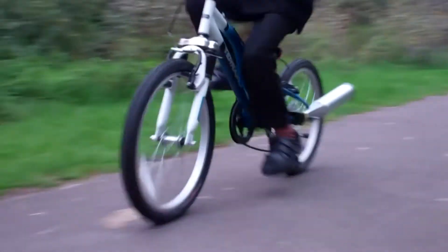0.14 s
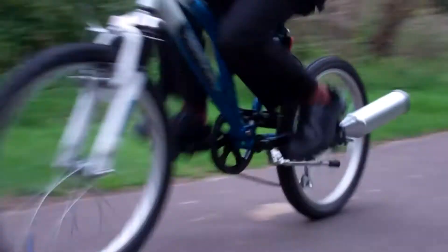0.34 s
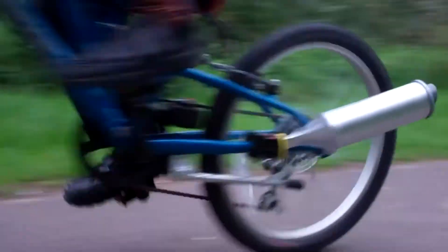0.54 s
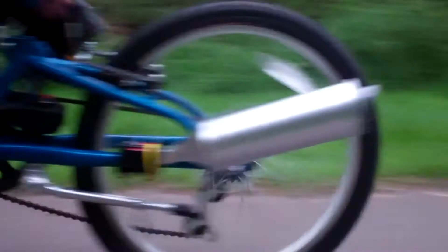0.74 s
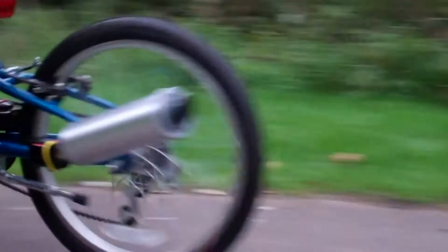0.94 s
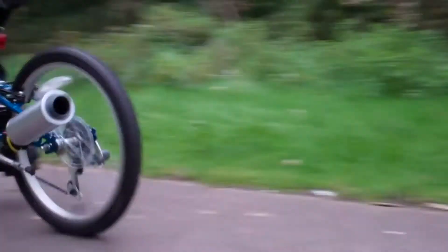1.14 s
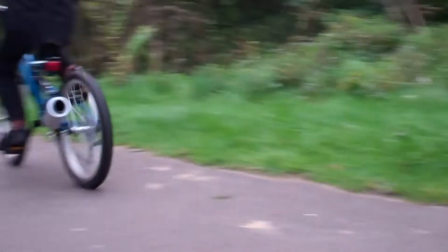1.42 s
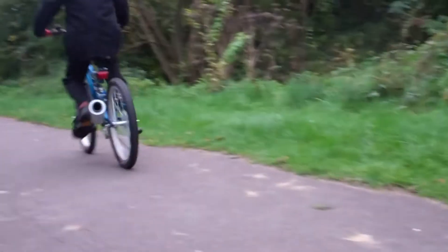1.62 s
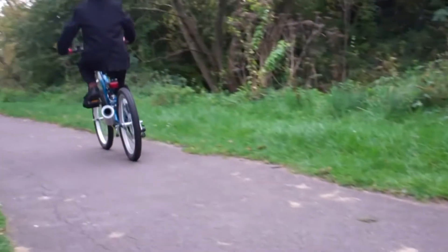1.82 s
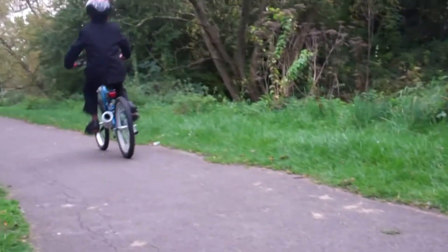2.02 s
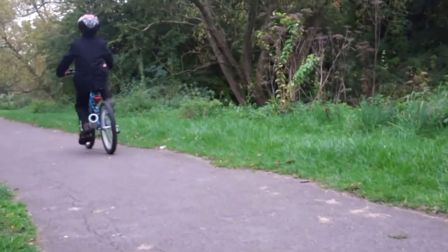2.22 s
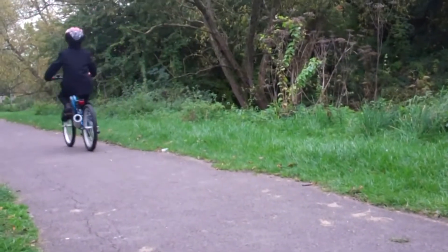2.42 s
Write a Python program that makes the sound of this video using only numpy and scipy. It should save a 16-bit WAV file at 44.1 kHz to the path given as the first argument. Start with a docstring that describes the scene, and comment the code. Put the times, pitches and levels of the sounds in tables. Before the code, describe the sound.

Rapid uneven snapping of card against turning bicycle spokes, swelling past and easing away on a path

```python
"""An uneven run of sharp snaps, much alike at every wheel turn: a bicycle rides past on a park path
with a stiff card flapping in its rear spokes, inside a toy exhaust pipe. Snaps and flaps are shaped noise
bursts, the card rings as decaying sines, and resonators driven by the flaps give the pipe's hollow notes.
A moving reflection off the path sweeps the colour and trees add a faint echo; there is one low thud.
A faint hum gives way to a low outdoor rumble of filtered noise."""
import sys
import numpy as np
from scipy import signal
from scipy.fft import rfft, irfft
from scipy.io import wavfile
from scipy.ndimage import uniform_filter1d, map_coordinates

SR = 44100
rng = np.random.default_rng(int(sys.argv[2]) if len(sys.argv) > 2 else 0)


def master_out(mix):
    """Clip the mix to full scale and print it as 16-bit PCM to the path in sys.argv[1]."""
    frames = np.transpose(np.atleast_2d(mix))
    ceiling = np.clip(frames, -1, 1)
    pcm = np.round(ceiling * 32767).astype(np.int16)
    wavfile.write(sys.argv[1], SR, pcm)


N = 112454   # samples

# completion of each half turn of the wheel: (time [s])
HALF_TURN_TIMES = [-.0374, .1356, .3042, .4737, .6468, .8178, .993, 1.1653, 1.3396, 1.5177, 1.6958, 1.8754,
                   2.0502, 2.2315, 2.4072, 2.5868, 2.756]
# lighter card-spoke contacts in one turn, relative levels:
# (wheel angle [deg], snap level [dB], flap level [dB], card ring level [dB])
LIGHT_CONTACTS = [(7.2, -7.0, -4.6, -5.6), (11.6, -19.7, -5.9, -7.0), (22.1, -2.8, 5.3, -2.0),
                  (28.6, 0.0, -4.8, -18.7), (31.8, -10.0, -6.5, -6.4), (39.3, -1.7, 2.3, 1.4),
                  (58.6, -2.9, -0.7, -5.0), (63.9, -15.3, -6.9, -6.5), (73.5, -5.2, 5.4, -2.4),
                  (80.4, -0.2, -4.8, -17.3), (90.8, -1.7, 2.6, 3.2), (109.5, -7.2, -4.4, -10.0),
                  (113.4, -5.3, -0.8, -5.9), (124.6, -4.8, 4.2, -4.1), (131.3, -2.3, -9.9, -17.9),
                  (134.2, -14.8, -16.4, -7.0), (141.6, -1.7, 1.5, 4.7), (160.4, -3.9, -4.5, -4.6),
                  (164.4, -8.0, -6.1, -2.7), (175.8, -6.0, 2.4, -1.6), (182.3, -3.6, -5.4, -15.1),
                  (185.3, -11.6, -15.9, -7.8), (192.9, -2.9, 1.5, 3.0), (212.0, -4.5, -0.0, -2.8),
                  (226.8, -7.2, 3.7, -2.0), (233.8, -2.5, -3.7, -15.0), (236.9, -10.0, -7.4, -4.8),
                  (244.6, -1.6, -0.4, 0.3), (264.3, -5.4, -2.3, -19.2), (267.9, -16.9, -16.6, -9.3),
                  (278.0, 0.2, 2.4, -15.9), (284.4, -3.6, -6.5, -3.8), (287.8, -7.6, -12.3, -13.4),
                  (292.4, -11.3, -14.9, -21.6), (294.1, -19.7, -10.8, -12.0), (305.7, -20.5, -19.8, -20.1),
                  (313.9, -16.3, -9.4, -8.6), (317.1, -6.2, -9.4, -3.3), (331.0, -3.7, 5.8, -0.0),
                  (338.0, -0.9, -3.6, -11.3), (341.4, -8.0, -2.3, -8.5), (348.5, -2.0, 2.6, 5.3)]
SCATTER_DB, SCATTER_S = .4, .00015   # standard deviation from one turn to the next
# hardest slap of each group of spokes; snap level relative, ring level absolute:
# (time [s], snap level [dB], ring peak level [dB], ring frequency [Hz], ring decay [s])
HARD_SLAPS = [(0.0121, 1, -12, 2620, 0.0018), (0.0611, 0, -14, 2800, 0.0018), (0.11, 0, -12, 2780, 0.0018),
              (0.1592, -0.2, -17.6, 3400.0, 0.0018), (0.2083, 2.2, -17.7, 3270.0, 0.0018),
              (0.3047, 1.9, -7.0, 3130.0, 0.0018), (0.3534, 1.0, -15.0, 3460.0, 0.0018),
              (0.4009, 0.6, -17.1, 2950.0, 0.0018), (0.4489, -0.2, -14.3, 3360.0, 0.0018),
              (0.498, 1.8, -9.0, 2810.0, 0.0018), (0.548, 1.0, -10.4, 3050.0, 0.0018),
              (0.6475, 1.1, -9.9, 3330.0, 0.0035), (0.6956, 3.6, -8.2, 3340.0, 0.0035),
              (0.7443, 0.8, -7.8, 3430.0, 0.0035), (0.7929, 1.5, -5.7, 3380.0, 0.0035),
              (0.8427, -0.5, -4.7, 3240.0, 0.0035), (0.8934, -0.9, -8.0, 3200.0, 0.0035),
              (0.9942, 0.6, -5.9, 2650.0, 0.0035), (1.0424, 1.3, -8.4, 2820.0, 0.0035),
              (1.0919, 1.3, -11.5, 2970.0, 0.0035), (1.1405, -1.0, -8.3, 3350.0, 0.0035),
              (1.1906, -1.0, -7.5, 2770.0, 0.0035), (1.24, 0.8, -8.4, 2960.0, 0.0035),
              (1.3406, 2.1, -9.8, 3290.0, 0.0018), (1.3912, -0.3, -13.1, 3310.0, 0.0018),
              (1.4423, 2.4, -15.1, 2510.0, 0.0018), (1.4925, 2.7, -19.0, 3480.0, 0.0018),
              (1.5427, 3.9, -16.3, 2510.0, 0.0018), (1.5938, -2.5, -16.9, 2870.0, 0.0018),
              (1.6965, 1.0, -11.6, 2810.0, 0.0018), (1.7482, 1.0, -13.3, 2750.0, 0.0018),
              (1.7994, 2.0, -10.6, 2870.0, 0.0018), (1.8497, 2.9, -10.6, 3250.0, 0.0018),
              (1.9001, -0.6, -14.9, 2920.0, 0.0018), (1.9502, 2.4, -12.7, 2970.0, 0.0018),
              (2.0517, 1.3, -13.4, 2910.0, 0.0018), (2.103, -2.4, -17.0, 3070.0, 0.0018),
              (2.1544, 2.8, -12.7, 2890.0, 0.0018), (2.2053, 2.5, -13.2, 2810.0, 0.0018),
              (2.2564, -0.0, -13.7, 2750.0, 0.0018), (2.3073, 0.2, -11.8, 2980.0, 0.0018),
              (2.4083, 4.0, -12.9, 2920.0, 0.0018), (2.4589, -0.0, -10.3, 2800.0, 0.0018),
              (2.5101, 2.0, -11.9, 2870.0, 0.0018)]
SLAP_FLAP_DB = 2.5
# levels along the ride: (time [s], snap level [dB], flap level [dB], pipe level [dB], light ring level [dB])
RIDE_LEVELS = [(0, -23, -25.5, -33, -51), (.22, -23, -26.5, -31, -29.5), (.3, -22, -28, -28, -33),
               (.42, -23, -49, -29.5, -39.5), (.57, -19.5, -38, -28.5, -22.5), (.7, -21, -31, -26.5, -36.5),
               (.88, -17.5, -27, -25.5, -28), (1.1, -21, -37, -27, -33.5), (1.3, -23, -41, -30, -33),
               (1.6, -24, -49, -32.5, -35.5), (1.9, -25, -35, -35.5, -44), (2.15, -24, -35.5, -35, -39),
               (2.33, -24, -39.5, -30.5, -36), (2.42, -22.5, -33.5, -33.5, -31), (2.55, -28, -42, -33, -37)]

# spectrum of the snap: (frequency [Hz], relative spectral level [dB])
SNAP_SPECTRUM = [(200, -15), (700, -28), (1400, -0.5), (2200, 0), (3000, -2.5), (3900, 1), (5000, 2.5),
                 (7500, 1), (10000, 0.5), (13500, 3.5), (16000, -11)]
# edges of the bands that each snap tints separately: (frequency [Hz])
SNAP_BAND_EDGES = [150, 1200, 1800, 2500, 3600, 4800, 6300, 8300, 11000, 16500]
SNAP_RISE_S, SNAP_DECAY_S = .0003, .0015
FLUTTER_DECAY_S, FLUTTER_DB = .007, -14.5   # weaker, longer tail, relative to the snap
COLOUR_SCATTER_DB, GRAIN_DB = 2.4, 3.0   # random band tint and fast level grain
# spectrum of the duller flap: (frequency [Hz], relative spectral level [dB])
FLAP_SPECTRUM = [(60, -25), (150, -9), (250, -4), (350, -10), (480, -7.5), (620, -7.5), (800, 2.5),
                 (1050, -6), (2000, -2), (3500, -2.5), (8000, -10.5)]
FLAP_RISE_S, FLAP_DECAY_S = .00036, .0055

# ringing pitch of the bent card, before the light contacts' factor: (time [s], frequency [Hz])
CARD_PITCH = [(0, 2800), (.3, 3200), (.65, 3350), (.75, 3430), (.85, 3300), (1.0, 2980), (1.2, 2980),
              (1.36, 3200), (1.55, 2550), (1.8, 2900), (2.55, 2850)]
# modes of the card: (ratio to its ringing pitch [1], level [dB])
CARD_MODE_TABLE = [(1, 0), (.8, -10)]
CARD_SPREAD, LIGHT_PITCH, LIGHT_DECAY_S = .06, .96, .0018   # pitch deviation and factor as ratios
# resonances of the pipe: (frequency [Hz], bandwidth [Hz],
# level with its mouth turned away [dB], sideways [dB], towards the listener [dB])
PIPE_RESONANCES = [(270, 57, -5, -19, -13), (484, 116, 0.5, -8, -29), (765, 110, 4.5, -4, -20),
                   (862, 48, -4, 2.5, 8), (1098, 160, -7, -2, -8), (1483, 52, -6, 1.5, -2),
                   (1995, 55, 7.5, 6, 5), (2410, 33, 9, 3.5, 15), (2937, 73, 6.5, 2.5, 5),
                   (3324, 74, -9, 3, -21)]
# aim of the pipe's mouth: (time [s], facing [-1 away, 0 sideways, 1 towards])
PIPE_FACING = [(.5, -0.64), (.75, 0.26), (1.05, 0), (1.45, 0.23)]
PIPE_DECAY_S, PIPE_SCATTER_DB = .0022, 2.2   # each flap strikes each note with its own strength

# colour of the reflection off the path: (frequency [Hz], level [dB])
GROUND_COLOUR = [(300, -24), (1000, 1.5), (2500, -12.5), (5000, -26), (10000, -25)]
# strength of that reflection along the ride: (time [s], level [dB])
GROUND_STRENGTH = [(0, -40), (.6, -18), (1.0, -3), (1.65, -3), (2.0, -19), (2.55, -43)]
PASS_S, SPEED_M_PER_S, SOUND_M_PER_S = .8, 5.6, 343
NEAREST_M, CARD_HEIGHT_M, LISTENER_HEIGHT_M = 1.65, .35, .97
TREES_T60_S, TREES_DB, TREES_CUT_HZ = .35, -12.5, 7000
# stereo image: (frequency [Hz], side-to-mid level [dB], left-right level [dB])
STEREO_WIDTH = [(100, -9.5, -0.5), (250, -10, 0.5), (616, -20, 1.5), (1500, -14, -1.5), (2720, -17, -0.5),
                (5100, -6, -.2), (9000, -6.5, -1), (13900, -5, -5)]
# lag of the right channel as the bicycle moves to the left: (time [s], lag [s])
RIGHT_CHANNEL_LAG = [(0, -.000008), (.65, .000006), (1.1, .000023), (2.55, .000023)]

THUD_S, THUD_HZ, THUD_DECAY_S = .7922, 276, .00081   # close to the nearest point
THUD_DB, THUD_LEFT_DB, THUD_LOW_CUT_HZ = 2, -26, 78   # level before damping; left relative to right
# spectrum of the outdoor rumble and air: (frequency [Hz], relative spectral level [dB])
AIR_SPECTRUM = [(20, -26), (35, -8), (55, 3.5), (85, -1), (112, 0.5), (150, -9), (200, -17.5), (300, -22.5),
                (1000, -10), (4000, -29), (15000, -33.5)]
# strength of the rumble and air: (time [s], level [dB])
AIR_STRENGTH = [(0, -51), (.3, -58), (.335, -39.5), (.9, -38), (1.2, -41.5), (2, -40), (2.55, -40.5)]
HUM_HZ, HUM_DB, HUM_END_S = 77, -48.5, .31
CLIP_TOP, CUTOFF_HZ = 3.0, 14400   # limit of the amplitude, upper edge of the band


def from_db(db):
    """Level is logarithmic: decibels to amplitude gain."""
    return 10 ** (np.asarray(db) / 20)


def rms_one(x):
    """Normalization to unit root-mean-square amplitude."""
    return x / np.sqrt(np.mean(x ** 2) + 1e-20)


def in_time(rows):
    """Linear interpolation of each column of a time curve at every sample."""
    s, *columns = np.transpose(rows)
    return [np.interp(np.arange(N) / SR, s, c) for c in columns]


def colour(x, points):
    """Spectral weighting by a level curve, linear in dB over log frequency."""
    hz, db = np.transpose(points)
    bins = np.maximum(np.arange(N + 1) * SR / (2 * N), 1)
    gain = from_db(np.interp(np.log(bins), np.log(hz), db))
    return irfft(rfft(x, 2 * N) * gain)[..., :N]


def low_pass(x, hz):
    """First-order relaxation: a gentle one-pole roll-off."""
    r = np.exp(-2 * np.pi * hz / SR)
    return signal.lfilter([1 - r], [1, -r], x)


def delayed(x, lag_s):
    """Propagation delay: a signal read with a moving lag."""
    return map_coordinates(x, [np.arange(N) - lag_s * SR], order=3)


def envelope(s, db, rise_s, decay_s):
    """Impulsive excitation: a quick rise and an exponential fall at each contact."""
    clicks = np.bincount((s * SR).astype(int), from_db(db), N) + 1e-18
    rise, fall = np.exp(-1 / (rise_s * SR)), np.exp(-1 / (decay_s * SR))
    return signal.lfilter([1 - rise], np.convolve([1, -rise], [1, -fall]), clicks)


def contacts():
    """Periodic excitation: each turn repeats the spoke contacts, slightly scattered in time and level."""
    turns = np.arange(len(HALF_TURN_TIMES)) / 2
    rows = []
    for turn in range(len(turns) // 2):
        for deg, *db in LIGHT_CONTACTS:
            start = np.interp(turn + deg / 360, turns, HALF_TURN_TIMES)
            rows.append((start, *db))
    rows = np.array(rows)
    rows = rows + rng.standard_normal(rows.shape) * [SCATTER_S, SCATTER_DB, SCATTER_DB, SCATTER_DB]
    return rows[(rows[:, 0] > 0) & (rows[:, 0] < (N - 1) / SR)].T


def snaps(s, db):
    """Broadband impact: the card's edge cracks grainily off a spoke and flutters, each time newly tinted."""
    out = 0
    tints = rng.standard_normal((len(s), len(SNAP_BAND_EDGES) - 1)).T
    tints = tints - tints.mean(axis=0)   # the tint shifts the colour, not the mean band level
    for tint, edges in zip(tints, zip(SNAP_BAND_EDGES, SNAP_BAND_EDGES[1:])):
        level = db + COLOUR_SCATTER_DB * tint
        crack = envelope(s, level, SNAP_RISE_S, SNAP_DECAY_S)
        flutter = envelope(s, level + FLUTTER_DB, SNAP_RISE_S, FLUTTER_DECAY_S)
        roughness = rms_one(uniform_filter1d(rng.standard_normal(N), size=8))
        grain = from_db(GRAIN_DB * roughness)
        noise = (crack + flutter) * grain * rng.standard_normal((2, N))
        band = signal.butter(2, edges, "band", fs=SR, output="sos")
        out = out + signal.sosfilt(band, noise)
    return rms_one(colour(out, SNAP_SPECTRUM))


def flaps(s, db):
    """Radiation by a moving plate: the face of the card slaps the air in dull noise bursts."""
    bursts = envelope(s, db, FLAP_RISE_S, FLAP_DECAY_S) * rng.standard_normal((2, N))
    return rms_one(colour(bursts, FLAP_SPECTRUM))


def card_ring(s, db, hz, decay_s):
    """Free vibration: each contact starts damped sinusoidal modes of the bent card."""
    t = np.arange(SR // 40) / SR
    out = np.zeros((2, N + len(t)))
    for ratio, mode_db in CARD_MODE_TABLE:
        phases = rng.random((len(s), 2, 1))   # in cycles, separate for mid and side
        for start, level, pitch, decay, phase in zip(s, db, hz, decay_s, phases):
            i = max(int(start * SR), 0)
            shape = np.exp(-t / decay) * (1 - np.exp(-t / SNAP_RISE_S))
            tone = np.sin(2 * np.pi * (ratio * pitch * t + phase))
            out[:, i:i + len(t)] += from_db(level + mode_db) * shape / shape.max() * tone
    return out[:, :N]


def light_rings(s, db):
    """Free vibration after the lighter contacts, at a lowered and randomly spread pitch."""
    spread = 1 + CARD_SPREAD * rng.standard_normal(len(s))
    hz = LIGHT_PITCH * np.interp(s, *np.transpose(CARD_PITCH)) * spread
    return rms_one(card_ring(s, db, hz, np.full(len(s), LIGHT_DECAY_S)))


def pipe(s, db):
    """Resonance: flaps excite the pipe's air column, whose notes change in level as its mouth comes round."""
    out, facing = 0, in_time(PIPE_FACING)[0]
    chances = rng.standard_normal((len(s), len(PIPE_RESONANCES))).T
    for (hz, width_hz, *heard_db), chance in zip(PIPE_RESONANCES, chances):
        strikes = envelope(s, db + PIPE_SCATTER_DB * chance, SNAP_RISE_S, PIPE_DECAY_S)
        drive = strikes * rng.standard_normal((2, N))
        r = np.exp(-np.pi * width_hz / SR)   # pole radius from the bandwidth
        poles = [1, -2 * r * np.cos(2 * np.pi * hz / SR), r * r]
        note = signal.lfilter((1 - r * r) * np.array([1, 0, -1]), poles, drive)
        out = out + from_db(np.interp(facing, [-1, 0, 1], heard_db)) * note
    return rms_one(out)


def ground_echo(x):
    """Interference by reflection: the bounce off the path lags most when the bicycle is nearest."""
    distance = np.hypot(NEAREST_M, SPEED_M_PER_S * (np.arange(N) / SR - PASS_S))
    reflected = np.hypot(distance, LISTENER_HEIGHT_M + CARD_HEIGHT_M)   # image source below the path
    direct = np.hypot(distance, LISTENER_HEIGHT_M - CARD_HEIGHT_M)
    lag_s = (reflected - direct) / SOUND_M_PER_S
    bounce = np.array([delayed(c, lag_s) for c in colour(x, GROUND_COLOUR)])
    return from_db(in_time(GROUND_STRENGTH)[0]) * bounce


def trees(x):
    """Diffuse scattering: bushes and trees return a faint exponentially decaying noise echo."""
    t = np.arange(SR // 2) / SR
    tail = low_pass(rng.standard_normal((2, len(t))), TREES_CUT_HZ) * from_db(-60 * t / TREES_T60_S)
    response = rms_one(tail) / np.sqrt(len(t))   # unit energy
    return from_db(TREES_DB) * signal.fftconvolve(x, response, axes=1)[:, :N]


def stereo(pair):
    """Sum and difference of mid and side: narrow in the middle range, wide in the treble."""
    hz, side_db, pan_db = np.transpose(STEREO_WIDTH)
    mid, side = pair[0], colour(pair[1], np.c_[hz, side_db])
    left = colour(mid + side, np.c_[hz, pan_db / 2])
    right = colour(mid - side, np.c_[hz, -pan_db / 2])
    return np.array([left, right])


def thud():
    """Heavily damped oscillation: a single low knock, mostly on the right."""
    t = np.maximum(np.arange(N) / SR - THUD_S, 0)
    knock = np.sin(2 * np.pi * THUD_HZ * t) * np.exp(-t / THUD_DECAY_S)
    return from_db([[THUD_DB + THUD_LEFT_DB], [THUD_DB]]) * (knock - low_pass(knock, THUD_LOW_CUT_HZ))


def background():
    """Stationary noise and tone: low rumble with a little hiss, and a faint hum that gives way to it."""
    t = np.arange(N) / SR
    air = from_db(in_time(AIR_STRENGTH)[0]) * rms_one(colour(rng.standard_normal((2, N)), AIR_SPECTRUM))
    fade = np.clip((HUM_END_S - t) * 20 + .5, 0, 1)   # 50 ms, centred on the end time
    hum = from_db(HUM_DB) * np.sin(2 * np.pi * HUM_HZ * t) * fade
    return stereo(air) + hum


def scene():
    """Superposition: light contacts and hard slaps with their echoes, over thud and background."""
    light_s, light_snap_db, light_flap_db, light_ring_db = contacts()
    slap_s, slap_snap_db, *slap_ring = np.transpose(HARD_SLAPS)
    s = np.r_[light_s, slap_s]
    snap_db = np.r_[light_snap_db, slap_snap_db]
    flap_db = np.r_[light_flap_db, np.full(len(slap_s), SLAP_FLAP_DB)]
    snap_gain, flap_gain, pipe_gain, ring_gain = from_db(in_time(RIDE_LEVELS))
    rattle = snap_gain * snaps(s, snap_db)
    rattle = rattle + flap_gain * flaps(s, flap_db)
    rattle = rattle + pipe_gain * pipe(s, flap_db)
    rattle = rattle + ring_gain * light_rings(light_s, light_ring_db)
    rattle = rattle + card_ring(slap_s, *slap_ring)
    left, right = stereo(rattle + ground_echo(rattle) + trees(rattle))
    passing = np.array([left, delayed(right, in_time(RIGHT_CHANNEL_LAG)[0])])
    return passing + background() + thud()


def record(dry):
    """Saturation and band limiting: the loudest peaks are rounded and the top is cut."""
    rounded = CLIP_TOP * np.tanh(dry / CLIP_TOP)
    top_cut = signal.ellip(8, .3, 75, CUTOFF_HZ, fs=SR, output="sos")
    return signal.sosfilt(top_cut, rounded)


dry = scene()
out = record(dry)
master_out(out)
```